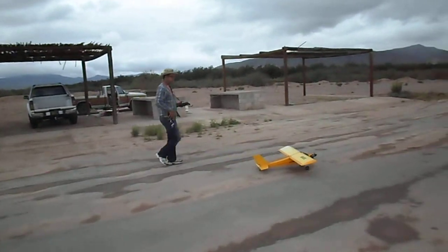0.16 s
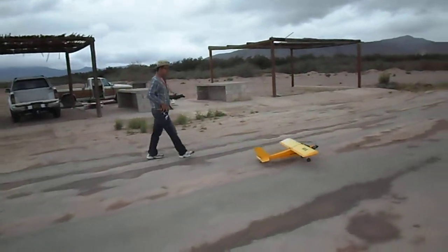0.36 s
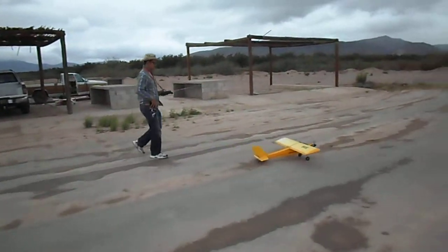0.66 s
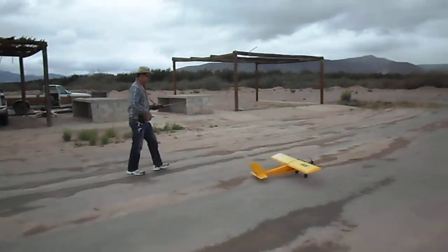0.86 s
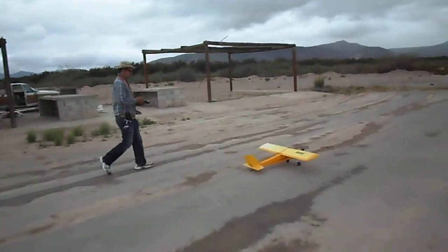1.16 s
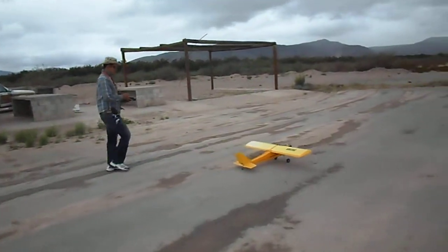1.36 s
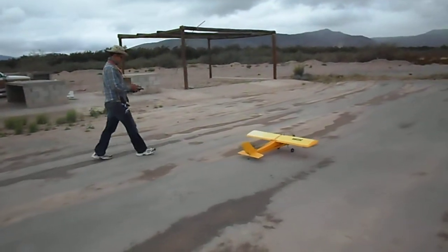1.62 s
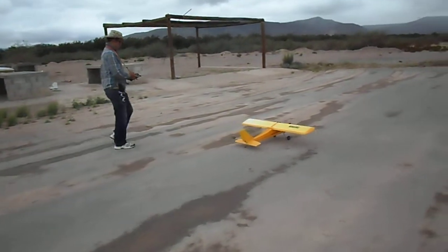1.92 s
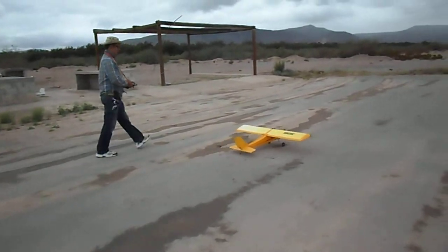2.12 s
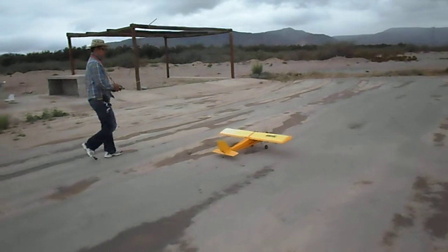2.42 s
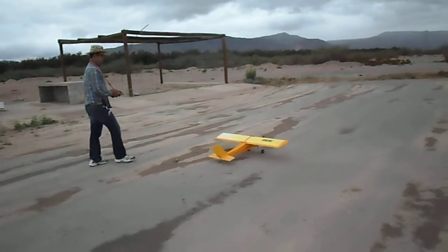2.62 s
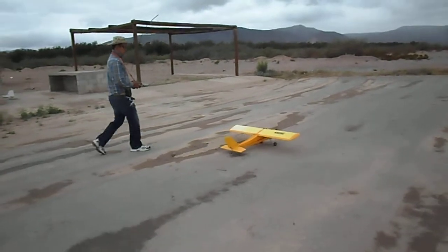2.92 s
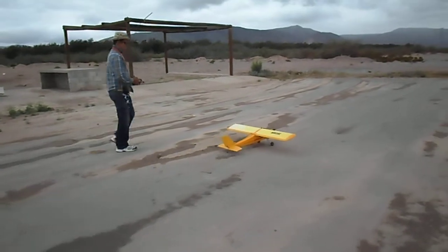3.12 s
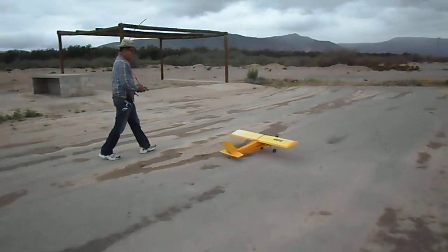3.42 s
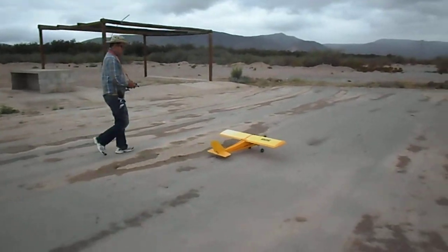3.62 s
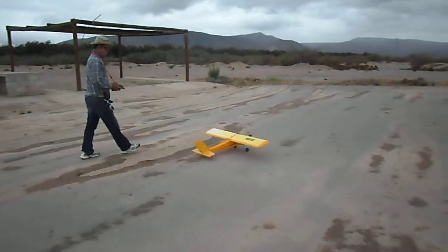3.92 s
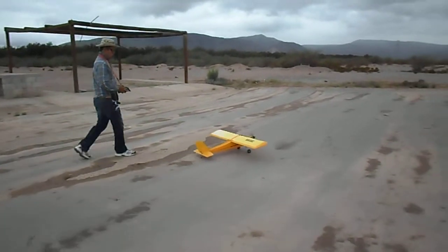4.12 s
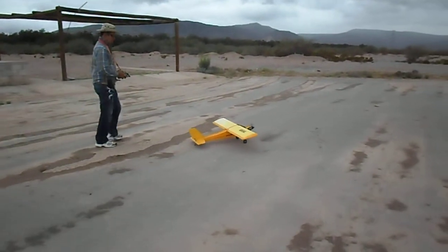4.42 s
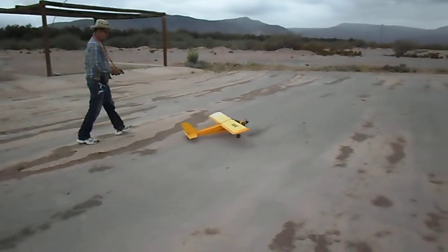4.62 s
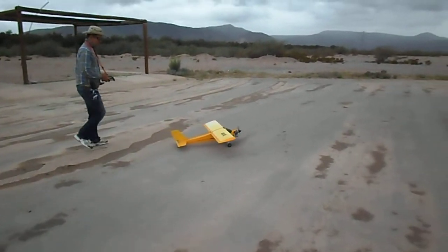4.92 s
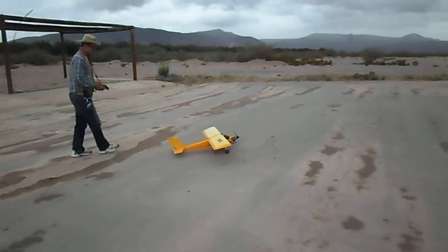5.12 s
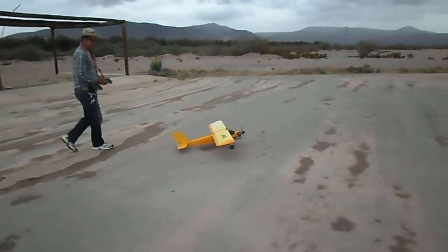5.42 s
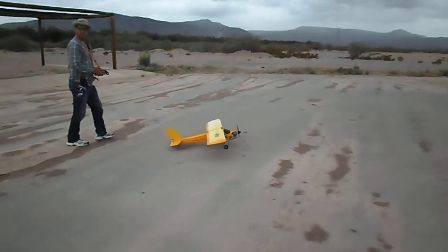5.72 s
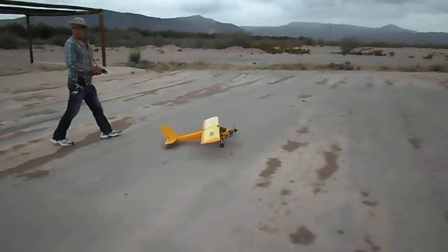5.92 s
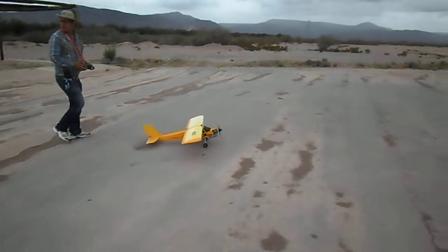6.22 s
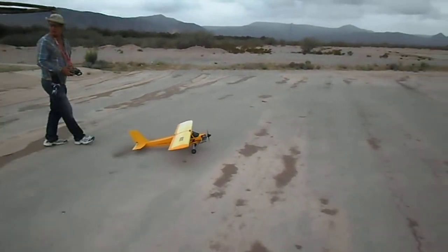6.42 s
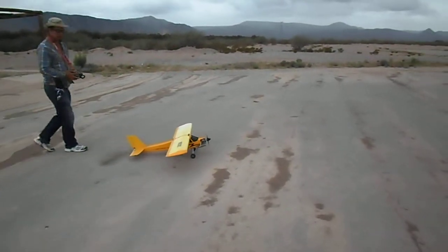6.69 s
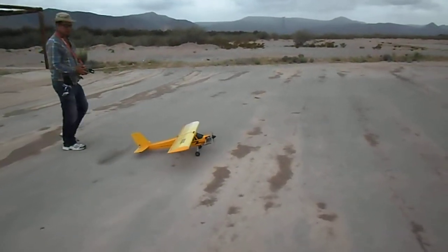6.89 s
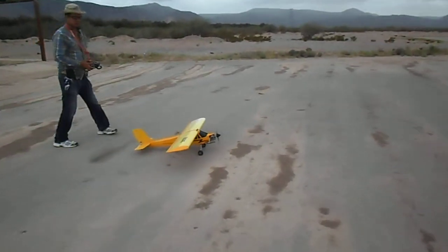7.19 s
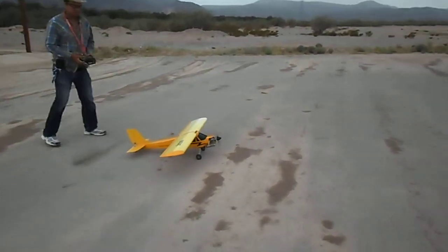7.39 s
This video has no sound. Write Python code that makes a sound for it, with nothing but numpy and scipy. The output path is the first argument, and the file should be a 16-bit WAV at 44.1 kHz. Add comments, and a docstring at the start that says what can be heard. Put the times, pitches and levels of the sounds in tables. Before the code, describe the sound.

A tiny glow engine putters at low throttle, distant at first, its buzzing pitch repeatedly climbing and falling with rough, barking bursts. Lumpy wind buffets a close handheld microphone in open air. After a scrape and knock at the middle, the sound drops and recovers louder, with tearing exhaust rasp, before turning abruptly dull under strong wind.

```python
"""A model plane taxis on an airstrip, at first tail-on and distant, its two-stroke glow engine blipped off idle.
The shaft lags each blip and sinks back; every turn puffs through the muffler and some charges bark.
Wind buffets the microphone throughout. Halfway a scrape grows into a thump on it and the level dips.
The plane then turns side-on, nearer and raspier: gas tears out of the pipe in spits.
Near the end the treble drops out abruptly, two glints of it flicker back, and a heavy gust hits."""
import sys
import numpy as np
from scipy import signal
from scipy.fft import rfft, irfft, next_fast_len
from scipy.io import wavfile
from scipy.ndimage import uniform_filter1d, map_coordinates

SR = 44100
rng = np.random.default_rng(int(sys.argv[2]) if len(sys.argv) > 2 else 0)


def file_out(sig):
    """Save sig as 16-bit WAV at sys.argv[1]."""
    # one column per channel
    cols = np.atleast_2d(sig).T
    # limit, then scale
    lim = np.clip(cols, -1, 1)
    pcm = np.round(lim * 32767).astype(np.int16)
    wavfile.write(sys.argv[1], SR, pcm)


N = 332989

IDLE_HZ = 58.3  # turns a second at idle
THUMP_S = 3.696  # when the microphone is knocked


def amp(db):
    """Amplitude of a level in dB."""
    return 10 ** (np.asarray(db) / 20)


def unit(x):
    """x scaled to rms 1."""
    return x / np.sqrt(np.mean(x ** 2) + 1e-20)


def curves(rows):
    """One value per sample for each column after the time."""
    s, *cols = np.transpose(rows)
    return [np.interp(np.arange(N) / SR, s, c) for c in cols]


def bell(s, half):
    """A smooth swell around time s."""
    return np.exp(-.5 * ((np.arange(N) / SR - s) / half) ** 2)


def wobble(rate):
    """A smooth random curve, rate knots a second."""
    knots = rng.standard_normal(int(N * rate / SR) + 4)
    return map_coordinates(knots, [np.arange(N) * rate / SR])


def noise():
    """White noise of rms 1."""
    return rng.standard_normal(N)


def filtered(x, response):
    """x times a complex response of frequency."""
    m = next_fast_len(N + SR // 2)
    return irfft(rfft(x, m) * response(np.fft.rfftfreq(m, 1 / SR)), m)[:N]


def coloured(x, points):
    """x through a causal filter with a spectrum of (f/Hz, level/dB) points on a log axis."""
    f, db = np.transpose(points)

    def response(hz):
        # folding the cepstrum forward in time makes the filter minimum-phase
        cepstrum = irfft(np.log(amp(np.interp(np.log(hz + 1), np.log(f), db))))
        half = len(cepstrum) // 2
        return np.exp(rfft(np.r_[cepstrum[0], 2 * cepstrum[1:half], np.zeros(half)]))
    return filtered(x, response)


def resonate(x, modes):
    """x through parallel (f/Hz, width/Hz, level/dB) resonances."""
    def response(f):
        return sum(amp(db) * 1j * f * w / (c * c - f * f + 1j * f * w) for c, w, db in modes)
    return filtered(x, response)


def loudness(x, band):
    """Running rms of x inside a band."""
    power = filtered(x, lambda f: (f > band[0]) & (f < band[1])) ** 2
    smooth = uniform_filter1d(uniform_filter1d(power, size=5000), size=5000)
    return np.sqrt(np.abs(smooth) + 1e-20)


def pulses(times, sizes):
    """Impulses placed between samples by a windowed sinc."""
    at = times[:, None] * SR
    taps = np.floor(at).astype(int) + np.arange(-7, 9)
    shape = np.sinc(taps - at) * np.sinc((taps - at) / 8)
    return np.bincount(np.clip(taps, 0, N).ravel(), (sizes[:, None] * shape).ravel(), N + 1)[:N]


def jets(times, sizes, rise):
    """A burst of gas noise at each time, swelling for rise seconds and then dying."""
    u = np.arange(SR // 20) / SR / rise
    swell = u * np.exp(-u)
    return signal.fftconvolve(pulses(times, sizes), swell / np.linalg.norm(swell))[:N] * noise()


def engine():
    """Soft ringing puffs, hard barks, the muffler's hum, gas rasp and piston clatter, all tied to the shaft."""
    # the plane's heading: t/s, turn (0 tail-on .. 1 side-on)
    heading = [(3.7, 0.012), (3.9, 0.54), (4.8, 0.6), (6.4, 0.73)]
    speed = shaft_speed()
    exhaust_db, rasp_db = engine_levels(speed)
    side = np.clip(curves(heading)[0], 0, 1)
    times, burn = firings(speed, climb=440, pull=220)
    facing = side[(times * SR).astype(int)]
    pipe = exhaust(times, burn, speed, facing, side)
    tones = amp(exhaust_db) * drone(times, speed)
    return amp(exhaust_db) * pipe + tones + amp(rasp_db - 2.5 + 4.4 * side) * rasp(times, burn, side)


def exhaust(times, burn, speed, facing, side):
    """Puffs and rushing gas through the muffler, barks straight out of the pipe, and the cavity's boom."""
    # the muffler heard from behind: f/Hz, level/dB
    tail_pipe = [(120, -1.5), (300, -9), (480, -6.5), (680, -15), (950, -11), (1130, -7), (1570, -7.5),
                 (1720, -26.5), (1870, -3.5), (2030, -16.5), (2260, -30.5), (2600, -24), (3000, -47.5),
                 (3400, -14.5), (3900, -42), (9000, -53.5)]
    # the muffler heard from the side: f/Hz, level/dB
    side_pipe = [(120, -20), (300, 3.5), (450, -20.5), (780, 1.5), (980, -13), (1240, -2.5), (1380, -6),
                 (1550, 7), (1780, -14.5), (1900, -26), (2200, -10.5), (3300, -43.5)]
    # a hard burn bursting straight out of the pipe: f/Hz, level/dB
    bark_colour = [(120, 0.5), (280, 9), (430, 1), (580, 12.5), (740, 12), (920, 2.5), (1400, 4),
                   (1700, -12.5), (1950, 3), (2260, -15.5), (2600, -14.5), (4000, -40.5), (9000, -39)]
    # hot gas raises the notes: share of pitch at twice idle speed; turns to heat up or cool
    heat_rise, heat_turns = 0.23, 1.5
    over_idle = speed[(times * SR).astype(int)] / IDLE_HZ - 1
    heat = signal.lfilter([1 / heat_turns], [1, 1 / heat_turns - 1], over_idle)
    pitch = 1 + heat_rise * heat + .015 * rng.standard_normal(len(times))
    # the muffler rings most freely on the turns that burn least
    puff = amp(rng.standard_normal(len(times)) - 2.4 * burn)
    # a little gas rushes after each puff, coloured as from behind the pipe
    gas = jets(times, .36 * puff + .2 * burn, rise=.004)
    from_behind = muffler(puffs(times, puff * (1 - facing), pitch) + gas, tail_pipe, lag=.001)
    from_side = muffler(puffs(times, puff * facing, pitch), side_pipe, lag=.001)
    blast = pulses(times, burn) + jets(times, .22 + .3 * burn, rise=.004)
    bursts = -(from_behind + from_side) - coloured(0.78 * blast, bark_colour)
    # the muffler's cavity booms through two low resonances in series
    boom = resonate(pulses(times, puff + .5 * burn), [(219, 61, 0.017)])
    boom = resonate(boom, [(189.0, 74.5, 0.017)])
    return (bursts + amp(19.5 - 5.4 * side) * boom) / loudness(bursts, (1100, 1700))


def rasp(times, burn, side):
    """Gas and piston noise just before each puff: clatter from behind, tearing spits from the side."""
    # piston clatter: f/Hz, relative level/dB per Hz
    clatter_colour = [(2000, 6), (4000, -8), (4600, -4), (5250, -8), (6400, 1.5), (7800, -12),
                      (10000, -12.5), (11200, -32)]
    # gas tearing out of the pipe: f/Hz, relative level/dB per Hz
    tearing_colour = [(1200, -12), (2200, -7.5), (2520, -22.5), (2830, -2.5), (2980, -14.5), (3270, 3.5),
                      (3600, -4), (3780, -1.5), (3950, -4.5), (4280, -8), (4550, -15.5), (5900, -15),
                      (6900, -20), (8700, -11.5), (11500, -23)]
    # gas hisses through the opening port 0.91 ms before the puff
    opening = times - 0.00091
    # from behind, the piston is heard knocking at both ends of its stroke
    clatter = jets(opening, 0.76 + .5 * burn, rise=0.0013)
    clatter = clatter + jets(opening + 0.0051, 0.5 + burn, rise=0.0029) + 0.022 * noise()
    # from the side, gas tears out of the pipe in spits, and a hard burn cracks
    crack = pulses(times, 0.42 * burn ** 2)
    tearing = flaps(opening, 0.95 + 2.5 * burn) - crack + 0.026 * noise()
    mix = (1 - side) * unit(coloured(clatter, clatter_colour))
    mix = mix + side * unit(coloured(tearing, tearing_colour))
    return mix / loudness(mix, (3000, 10000))


def shaft_speed():
    """Turns a second: the shaft spools up after each opening of the throttle and sinks back to idle."""
    # throttle blips: opens t/s, closes t/s, gain if held (turns/s)
    blips = [(-0.546, 0.503, 36.6), (1.127, 1.597, 18), (2.411, 2.805, 49.3), (3.038, 3.268, 59.5),
             (3.651, 4.053, 38.5), (4.562, 4.863, 54.2), (4.992, 5.327, 64.005), (6.24, 6.602, 24.9),
             (7.067, 7.612, 12.9)]
    spool_up_s, spool_down_s = .133, .114  # the shaft's lag behind the throttle

    def follow(start, lag):
        u = np.maximum(np.arange(N) / SR - start, 0) / lag
        return 1 - (1 + u) * np.exp(-u)
    return IDLE_HZ + sum(gain * (follow(opens, spool_up_s) - follow(closes, spool_down_s))
                         for opens, closes, gain in blips)


def firings(speed, climb, pull):
    """Time of each turn and how hard its charge burns: unburnt mixture builds up for two or three turns."""
    # the hardest firings: t/s, burn strength
    bark_rows = [(.167, 0.77), (0.283, 0.75), (.316, 1.2), (.358, 1.2), (.389, 1.4), (.421, 1.2),
                 (.464, 1.2), (.851, 0.77), (1.359, 0.92), (2.329, 0.56), (2.496, 0.65), (2.565, 0.83),
                 (2.59, 0.86), (2.617, 1.1), (2.638, 0.58), (2.66, .9), (2.682, 1.1), (2.714, 1),
                 (2.736, 0.85), (2.777, 1.4), (2.806, 1.56), (2.837, 0.73), (2.857, 1.2), (2.888, 0.93),
                 (3.143, 0.81), (3.239, 0.83), (3.262, 0.87), (3.305, 0.97), (4.861, 1.2), (5.107, 0.92),
                 (5.173, 0.94), (5.236, 1.3), (5.256, 1.2), (5.271, 1.1), (5.293, 0.75), (5.349, 0.77),
                 (6.069, 0.65), (6.12, 0.7), (6.17, 1.04), (6.256, 0.63), (6.368, 0.94), (6.457, 1.2),
                 (6.483, .9), (6.498, 1.1), (6.523, .9), (6.551, 0.79), (6.577, 0.56), (6.604, 0.73),
                 (6.643, 0.69)]
    t = np.arange(N) / SR
    bark_s, bark_burn = np.transpose(bark_rows)
    turns = np.cumsum(speed) / SR
    # the turns are shifted so that barks fall on whole turns of the shaft
    slip = np.interp(t, bark_s, np.unwrap(np.interp(bark_s, t, turns) % 1, period=1))
    turns = turns - uniform_filter1d(slip, size=3000)
    times = np.interp(np.arange(1, int(turns[-1])), turns, t)
    rate = np.interp(times, t, speed)
    # the load grows with the shaft's acceleration and speed
    load = np.clip(.3 + np.gradient(rate, times) / climb + (rate - rate.min()) / pull, .05, .75)
    chance = rng.standard_normal((len(times), 2))
    lit = np.isin(np.arange(len(times)), np.cumsum(2 + (chance[:, 0] > .5)))
    burn = load * np.where(lit, 1, .3) * amp(2 * chance[:, 1])
    # weak turns flank the barks
    barks = np.searchsorted(times, bark_s - .005)
    burn[barks - 1] = burn[barks + 1] = 0.12
    burn[barks] = bark_burn
    # the shaft turns a little unevenly
    return times + .00005 * rng.standard_normal(len(times)), burn


def engine_levels(speed):
    """Exhaust and rasp in dB: both grow as the plane nears and with the shaft's speed."""
    # at idle, as the plane rolls nearer and turns: t/s, exhaust level/dB, rasp level/dB before the heading's trim
    approach = [(0, -58, -73.5), (1.4, -52.5, -65.5), (3.7, -49, -59.5), (5.3, -43, -48),
                (5.85, -44.5, -52), (6.2, -45, -42.5), (6.6, -43, -42.5), (6.9, -41.5, -50),
                (7.55, -41, -54.5)]
    # the rasp flares up: t/s, level/dB, half length/s
    flares = [(.71, 8, 0.028), (2.6, 5, 0.061), (3.125, 5.5, 0.057), (5.6, 11, 0.027), (6.686, 8.5, 0.079)]
    exhaust_db, rasp_db = curves(approach)
    octaves, dip = np.log2(speed / IDLE_HZ), dip_db()
    flares_db = sum(db * bell(s, half) for s, db, half in flares)
    # a faster shaft is louder: dB per octave of speed; the rasp takes only a share of each dip
    return exhaust_db + 4.5 * octaves - dip, rasp_db + 6 * octaves + flares_db - 0.59 * dip


def dip_db():
    """How far the level has dipped after the thump and the heaviest gust: a sudden drop, a slow recovery."""
    # t/s, depth/dB, recovery/s
    dips = [(3.702, 22, 0.91), (7.12, 11.5, 0.39)]
    attack_s = .005
    t = np.arange(N) / SR
    return sum(db * np.clip((t - s) / attack_s, 0, 1) * bell(s, recovery) for s, db, recovery in dips)


def puffs(times, sizes, pitch):
    """A pulse at every turn and the ring of the gas behind it, higher when the gas is hot."""
    # the gas in the muffler at idle: f/Hz, width/Hz, level/dB
    gas_notes = [(1235, 100, 2), (1720, 43, -8)]
    at = times[:, None] * SR
    taps = np.ceil(at).astype(int) + np.arange(SR // 40)
    t = (taps - at) / SR
    ring = 0
    for hz, width, db in gas_notes:
        decay = 2 * np.pi * width / SR * np.exp(-np.pi * width * t)
        ring = ring + amp(db) * decay * np.cos(2 * np.pi * hz * pitch[:, None] * t)
    rings = np.bincount(np.clip(taps, 0, N).ravel(), (sizes[:, None] * ring).ravel(), N + 1)[:N]
    return pulses(times, sizes) + rings


def muffler(x, colour, lag):
    """The muffler's colour and ring; the port opens gradually, so the highs come up to lag seconds later."""
    # the ring: f/Hz, width/Hz, level/dB
    pipe_ring = [(1247.7, 23.4, 1)]

    def delay(f):
        # the delay grows up to 2 kHz, then stays at lag
        return np.exp(-2j * np.pi * lag * np.cumsum(np.minimum(f / 2000, 1)) * f[1])
    late = filtered(x, delay)
    return coloured(late + resonate(late, pipe_ring), colour)


def flaps(times, sizes, count=4):
    """A crisp spit of gas at each time, then weaker ones as the muffler's cavity surges."""
    period_s, shrink = 0.00405, 0.52  # between surges; size of each surge over the one before
    k = np.arange(count)[:, None]
    return jets((times + k * period_s).ravel(), (sizes * shrink ** k).ravel(), rise=.0007)


def drone(times, speed):
    """Smooth low tones under the exhaust: one cycle a turn from the shaft, two from the propeller's blades."""
    angle = 2 * np.pi * np.interp(np.arange(N) / SR, times, np.arange(len(times)))
    # dB over the exhaust level: the shaft tone grows per octave of speed, the blade tone keeps step
    shaft_db = -7.5 + 16.5 * np.log2(speed / IDLE_HZ)
    return amp(shaft_db) * np.sin(angle) + amp(-4.5) * np.cos(2 * angle)


def knocks():
    """Short damped clicks, knocks and wind pops, and a dull thump on the microphone."""
    # t/s, level/dB before the lowpass, ring f/Hz, t60/s, noise share
    hits = [(3.517, -24, 1840, 0.047, 0.6), (3.6611, 1, 2070, 0.0037, 0.1), (3.6617, 1, 4640, 0.0021, 0.11),
            (3.6957, -2, 112, 0.0097, 0.12), (6.226, -16, 5050, 0.045, 0.8),
            (7.3759, -12.5, 280, 0.011, 0.12), (7.472, -7.5, 680, 0.0042, 0.072)]
    out, t = np.zeros(N + SR), np.arange(SR // 10) / SR
    for s, db, hz, t60, share in hits:
        ring = np.cos(2 * np.pi * hz * t) * (1 - share) + share * rng.standard_normal(len(t))
        out[round(s * SR):][:len(t)] += amp(db - 60 * t / t60) * ring
    return filtered(out[:N], lambda f: 1 / (1 + 1j * f / 5000) ** 2)


def scuff(count=40):
    """Something scrapes the microphone in tiny slips that grow until the thump."""
    lead, size = rng.random((2, count))
    ticks = pulses(THUMP_S - .1 * lead, amp(-12 * lead - 14 * size))
    return filtered(ticks, lambda f: 1 / (1 + 1j * f / 2300) ** 2)


def suction():
    """Pressure builds on the microphone just before the thump and sags deeply after it."""
    fall_s, recovery_s = .002, .02
    u = np.maximum(np.arange(N) / SR - THUMP_S, 0)
    push = bell(THUMP_S - .016, .009)
    return amp(-8.5) * (push - (1 - np.exp(-u / fall_s)) * np.exp(-u / recovery_s))


def whistles():
    """Brief, faint thin tones that glide beside the engine."""
    # t/s, half length/s, f/Hz, glide/(Hz per s), level/dB
    glides = [(0.89, 0.017, 2085, 1800, -53), (4.219, .09, 1265, -330, -62),
              (4.418, 0.038, 1080, -450, -55)]
    t = np.arange(N) / SR
    return sum(amp(db) * bell(s, half) * np.sin(2 * np.pi * (hz + glide * (t - s) / 2) * (t - s))
               for s, half, hz, glide, db in glides)


def wind():
    """A lumpy rumble that swells with each gust, and smaller, brighter eddies in the gust's core."""
    # the wind between gusts: t/s, level/dB before the dips
    breeze_rows = [(0, -30), (2.1, -37.5), (7.55, -36)]
    # gusts on the microphone: t/s, half length/s, rumble level/dB, eddies level/dB
    gusts = [(0.181, 0.015, -31.5, -35), (0.694, 0.048, -34, -35), (1.516, 0.054, -24.5, -27.5),
             (1.796, 0.072, -23.5, -56), (2.258, 0.027, -30.5, -50.5), (3.003, 0.29, -30.5, -40.5),
             (3.653, 0.025, -23, -27.5), (3.963, 0.023, -37.5, -35), (4.035, 0.018, -37, -34.5),
             (4.101, 0.0099, -32, -34), (4.226, 0.033, -41.5, -48.5), (4.395, 0.0073, -28, -20.5),
             (4.464, 0.11, -29, -34), (4.589, 0.02, -24, -25.5), (5.327, 0.014, -24, -37),
             (5.426, 0.019, -22, -45), (5.648, 0.032, -19.5, -20), (6.554, 0.21, -33.5, -31.5),
             (7.073, 0.022, -19, -36.5), (7.125, 0.013, -7.5, -15), (7.245, 0.092, -17, -19),
             (7.41, 0.031, -27, -16.5), (7.524, 0.085, -20, -22)]
    # f/Hz, relative level/dB per Hz
    rumble_colour = [(8, -21.5), (22, 1), (50, -4.5), (100, -11), (170, -16), (300, -27.5), (2000, -73)]
    # f/Hz, relative level/dB per Hz
    eddy_colour = [(40, -1.5), (110, 1), (230, -1), (400, -12.5), (800, -24.5), (4000, -76)]
    core_share = 0.71  # the eddies fill only the core of a gust: share of its length
    overload = 0.5  # the microphone overloads gently at this wind pressure
    breeze = amp(curves(breeze_rows)[0] - 0.83 * dip_db())  # takes only a share of each dip
    rumble = coloured(noise(), rumble_colour) * amp(4.9 * wobble(30))
    rumble = rumble / loudness(rumble, (25, 160))
    swells = sum(amp(db) * bell(s, half) for s, half, db, _ in gusts)
    cores = sum(amp(db) * bell(s, core_share * half) for s, half, _, db in gusts)
    eddies = unit(coloured(noise() * amp(3 * wobble(90)), eddy_colour))
    pressure = (breeze + swells) * rumble + cores * eddies
    return overload * np.tanh(pressure / overload)


def scene():
    """The plane, the wind and the handling of the microphone together, in one channel."""
    return (engine() + wind() + whistles() + scuff() + knocks() + suction())[None]


def record(dry):
    """The treble drops out near the end, leaving thin hiss and two glints; the band ends steeply."""
    # narrow treble bands flicker back: t/s, half length/s
    glint_times = [(7.091, 0.024), (7.401, 0.012)]
    # the bands, passed twice: f/Hz, width/Hz, level/dB per pass
    glint_bands = [(3227, 71, 7), (3710, 106, 7)]
    treble_gone_s, top_hz = 6.973, 12100
    dull = filtered(dry[0], lambda f: 1 / np.sqrt(1 + (f / 1630) ** 50))
    treble = resonate(resonate(dry[0] - dull, glint_bands), glint_bands)
    glints = sum(bell(s, half) for s, half in glint_times) * treble
    gone = np.clip((np.arange(N) / SR - treble_gone_s) / 0.0022, 0, 1)
    sound = (1 - gone) * dry[0] + gone * (dull + glints + amp(-60.0) * noise())
    return filtered(sound, lambda f: (f < top_hz) / np.sqrt(1 + (f / 10400) ** 32))[None]


dry = scene()
out = record(dry)
file_out(out)
```